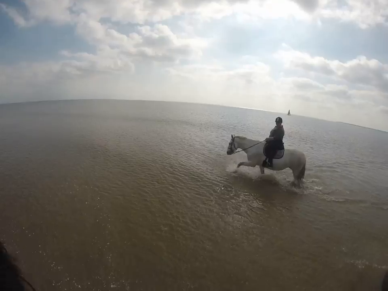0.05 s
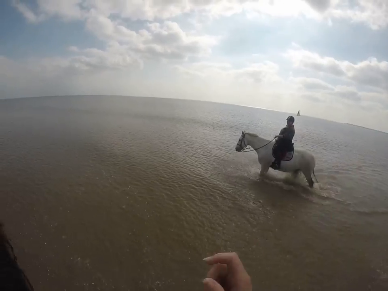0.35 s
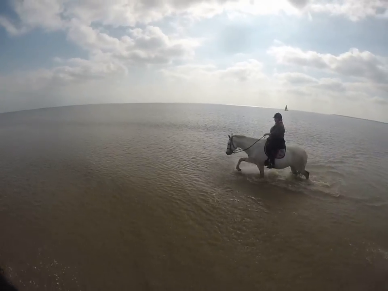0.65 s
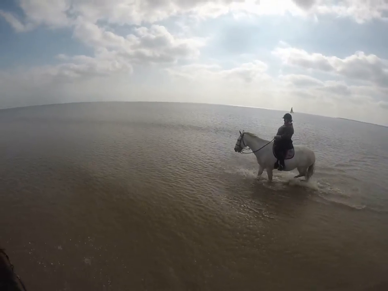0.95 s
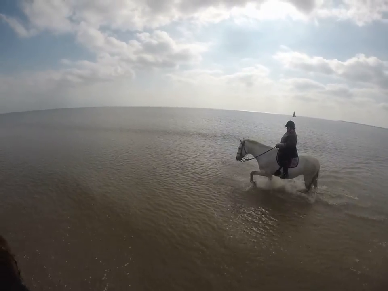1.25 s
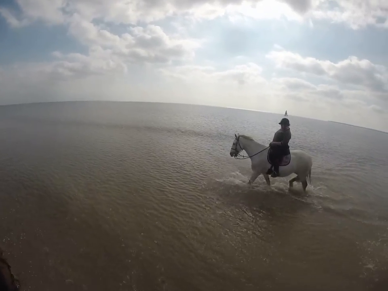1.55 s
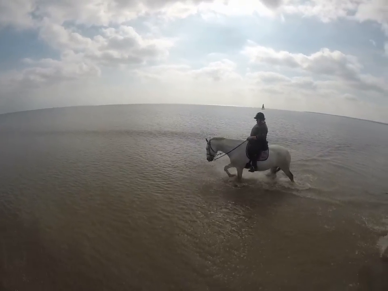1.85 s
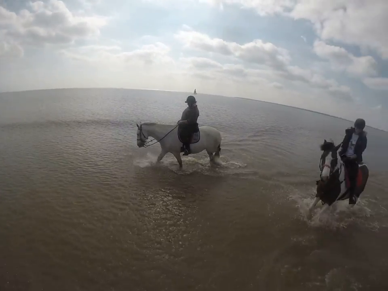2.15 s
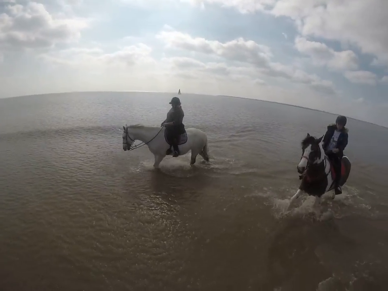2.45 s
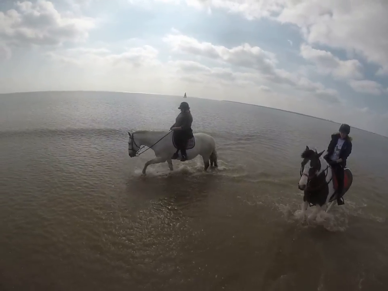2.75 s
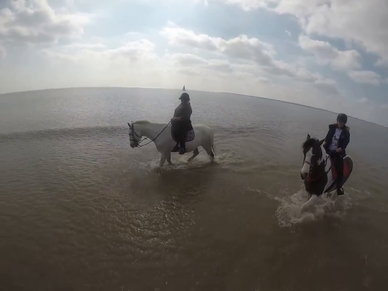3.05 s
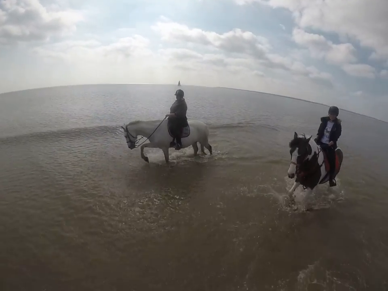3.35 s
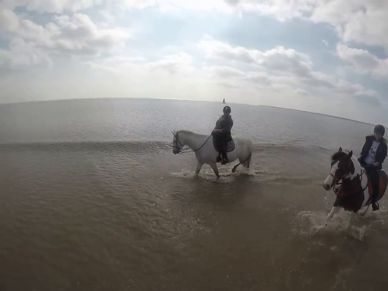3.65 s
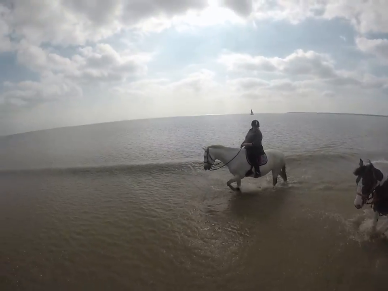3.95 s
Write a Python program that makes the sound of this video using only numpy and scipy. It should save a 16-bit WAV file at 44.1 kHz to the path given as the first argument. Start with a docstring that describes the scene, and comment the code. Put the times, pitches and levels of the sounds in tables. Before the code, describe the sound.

Two loud plastic clacks, then horses quietly splashing through shallow sea over low wind rumble.

```python
"""Sharp knocks and scuffs come first: a hand on the closed plastic housing of a rider's camera.
Then two horses wade through shallow sea. Their legs churn up bubbles, each ringing as a damped
oscillator, with spray, single splashes and gulps; air resonances of the housing colour the froth,
spray and splashes. Underneath, wind and the ride shake the camera mount into a low rumble."""
import sys
import numpy as np
from scipy.fft import rfft, irfft, next_fast_len
from scipy.io import wavfile
from scipy.ndimage import map_coordinates

SR = 44100
rng = np.random.default_rng(int(sys.argv[2]) if len(sys.argv) > 2 else 0)


def to_wav(sig):
    """Store sig (one row per channel, or 1-D mono) as 16-bit WAV at the path in sys.argv[1].

    Samples outside -1..1 are clipped; the rate is SR.
    """
    pcm = np.clip(np.atleast_2d(sig), -1, 1) * 32767
    pcm = np.round(pcm).astype(np.int16)
    wavfile.write(sys.argv[1], SR, pcm.T)  # frames by channels


N = 176400
T = np.arange(N) / SR

# Air resonances of the housing. Each row: centre in Hz, width in Hz, boost in dB.
HOUSING = [(1522, 300, 7.5), (1832, 30, 7.5), (2195, 210, 7), (2570, 210, 4.5), (3256, 264, 6),
           (3707, 200, 8), (4346, 180, 6.5), (4763, 230, 10.5), (5250, 280, 6), (6700, 320, 2.5),
           (8000, 450, 3), (9050, 270, 2.5), (11500, 650, 3)]


def churn():
    """Bubble resonance: legs whip air into the water, and each small pocket rings as it pulsates."""
    # Each row: time in seconds, relative level in dB.
    envelope = [(.24, -59.5), (.36, -59.5), (.48, -55.5), (.68, -52), (.8, -48), (.98, -51), (1.15, -50.5),
                (1.38, -50), (1.62, -48.5), (1.76, -50), (1.88, -46.5), (2.0, -51.5), (2.16, -47.5),
                (2.32, -50), (2.62, -48.5), (2.88, -50), (3.05, -48), (4.0, -51.5)]
    # Each row: frequency in Hz, relative gain in dB.
    spectrum = [(500, -37.5), (1000, -7), (1400, -2), (2000, 1.5), (2600, -0.5), (3300, -11), (6000, -45)]
    froth = bubbles(count=3000, pitch_hz=1798, spread=0.346, cycles=23, scatter_db=2, rise=0.27, size=700)
    water = unit(coloured(froth + amp(9.5) * rng.standard_normal(N), spectrum, HOUSING))
    return amp(-1.8) * level(envelope) * amp(0.23 * wobble(21.98)) * water


def spray():
    """Incoherent addition: thousands of drops falling back on the sea merge into a hiss."""
    # Each row: time in seconds, relative level in dB.
    envelope = [(0.22, -62), (0.26, -64), (0.83, -53.5), (1.09, -53.5), (1.1, -53), (1.26, -55.5),
                (1.55, -52), (2.03, -54), (2.07, -49.5), (2.32, -53), (2.5, -51), (2.75, -52.5),
                (3.16, -48.5), (3.21, -50.5), (3.5, -52), (3.54, -49.5), (3.62, -53.5), (4.0, -57)]
    # Spectra of far and near spray. Each row: frequency in Hz, relative gain in dB.
    far_spectrum = [(1500, -16), (3000, -1.5), (4500, -5), (6000, 1), (7400, -4.5), (10000, -8.5),
                    (13000, -14), (15500, -21)]
    near_spectrum = [(1500, -43), (3000, -1.5), (4500, -4.5), (6800, 2), (7500, -5.5), (10000, -9),
                     (13000, -16), (15500, -19)]
    drops = bubbles(count=5000, pitch_hz=6160, spread=0.59, cycles=6.9, scatter_db=3.5, rise=.1, size=120)
    patter = drops + amp(5) * rng.standard_normal(N)
    near = np.interp(T, [1.97, 2.4], [0, 1])  # the second horse draws alongside
    hiss = (1 - near) * unit(coloured(patter, far_spectrum, HOUSING))
    hiss += near * unit(coloured(patter, near_spectrum, HOUSING))
    return amp(-0.86) * level(envelope) * amp(0.77 * wobble(24.38)) * hiss


def slosh():
    """Pitch falls as bubble radius grows: water heaving round the legs traps large, low bubbles."""
    # Each row: time in seconds, level in dB.
    envelope = [(0.27, -64.5), (0.88, -52), (1.02, -56.5), (1.16, -50.5), (1.31, -55), (1.59, -51.5),
                (1.74, -55), (1.85, -48), (1.89, -55), (2.19, -55), (2.2, -51.5), (2.34, -55.5),
                (2.85, -53.5), (2.98, -55.5), (3.19, -52), (3.23, -50.5), (3.27, -55), (4.0, -54.5)]
    # Each row: frequency in Hz, relative gain in dB.
    spectrum = [(50, -19.5), (90, 0.5), (160, -2), (330, -4.5), (600, -5), (1000, -2.5), (1600, -7.5),
                (3000, -59)]
    cloud = bubbles(count=1800, pitch_hz=521.4, spread=0.602, cycles=19.5, scatter_db=2, rise=0.23,
                    size=2400)
    water = unit(coloured(cloud + amp(8.5) * rng.standard_normal(N), spectrum))
    return level(envelope) * amp(.5 * wobble(16)) * water


def gulps():
    """Damped oscillation: single bubbles, from deep gulps to plinks, rise in pitch as they fade."""
    # Each row: start in seconds, initial pitch in Hz, level in dB, time to fall 60 dB in seconds.
    single_bubbles = [(.88, 376, -47, .12), (1.535, 300, -42, .05), (1.795, 258, -44, 0.061),
                      (1.845, 346, -44, .06), (1.85, 620, -52, 0.038), (2.205, 313, -41, 0.039),
                      (2.785, 362.6, -43, 0.05), (3.146, 3570, -30.5, 0.023), (3.148, 4180, -35.5, .025),
                      (3.225, 266, -43, .09), (3.232, 173, -37.5, 0.06), (3.235, 780, -46.5, 0.096),
                      (3.55, 170, -57, 0.089), (3.836, 870, -35.5, 0.027)]
    out = np.zeros(N)
    for s, hz, db, t60 in single_bubbles:
        t = since(s)
        glide = 1 + 0.072 * np.minimum(t / t60, 1)
        attack = 1 - np.exp(-t / 0.0032)
        out += amp(db - 60 * t / t60) * attack * np.sin(2 * np.pi * hz * t * glide)
    return out


def splashes():
    """Impact noise: a hoof breaks the surface, and the spatter swells fast and decays exponentially."""
    # Each row: start in seconds, level in dB, time scale in seconds, tilt in dB per octave.
    impacts = [(0.486, -53.5, 0.026, 0.5), (0.581, -51.5, 0.033, -10), (1.106, -38.5, 0.0092, -1),
               (1.125, -48, 0.041, 0), (1.201, -45, 0.016, -1.5), (1.562, -48, 0.077, -2.5),
               (2.067, -51, 0.075, -1.5), (2.14, -45, 0.0065, -6), (2.204, -48, 0.022, -1),
               (2.392, -53, 0.023, 3), (2.957, -42.5, 0.022, -2), (3.052, -48, 0.033, 1),
               (3.144, -50, 0.01, 0), (3.313, -43, 0.005, -10), (3.508, -51.5, 0.022, 2),
               (3.858, -46, 0.037, -5)]
    # Each row: frequency in Hz, relative gain in dB.
    spectrum = [(300, -39), (900, -13.5), (1400, -2.5), (2300, -1), (3000, -11), (5000, -6.5),
                (7000, -11.5), (10500, -17.5), (15000, -27)]
    out = np.zeros(N)
    for s, db, length, tilt in impacts:
        age = since(s) / length
        envelope = amp(db) * 2 * (1 - np.exp(-age / 0.21)) * np.exp(-1.6 * age)
        out += envelope * unit(coloured(rng.standard_normal(N), spectrum, HOUSING[:3], tilt))
    return out


def knocks():
    """Impulse response: the struck plastic shell clacks, rings faintly and snaps."""
    # Two knocks and a rebound. Each row: start in seconds, level in dB, tilt in dB per octave.
    blows = [(.0786, -9, 6.5), (0.1753, -1, 2.5), (0.1777, -20, 6)]
    # Each row: frequency in Hz, level relative to the knock in dB, time to fall 60 dB in seconds.
    shell_modes = [(1808, -37.5, 0.24), (1874, -37.5, 0.17)]
    # Each row: start in seconds, pitch in Hz, level in dB, time to fall 60 dB in seconds.
    fingertip_taps = [(.1175, 850, -33, 0.049)]
    # Each row: start in seconds, peak in dB.
    snaps = [(.0779, -24), (.0786, -4.5), (0.0788, -19)]
    # Each row of both spectra: frequency in Hz, relative gain in dB.
    clack_spectrum = [(200, 0), (500, -7.5), (850, -14), (1350, 1), (1550, -3.5), (1900, 1), (2200, 3.5),
                      (2480, -4.5), (2800, -26.5), (4100, -16.5), (5300, -27.5), (6300, -20), (7500, -41.5),
                      (8700, -30.5), (11000, -48), (15000, -59)]
    snap_spectrum = [(1000, -38), (4000, 0.5), (7000, 0), (9000, 8), (11500, 5), (13000, -5), (16000, -26)]
    out = np.zeros(N)
    for s, db, tilt in blows:
        ring = sum(damped_sine(s, *mode) for mode in shell_modes)
        out += amp(db) * (click(s, clack_spectrum, tilt) + ring)
    out += sum(damped_sine(*tap) for tap in fingertip_taps)
    return out + sum(amp(db) * click(s, snap_spectrum) for s, db in snaps)


def scuffs():
    """Sliding friction: fingers rub the housing in short bursts of noise."""
    # Each row: start in seconds, length in seconds, level in dB.
    rubs = [(.075, 0.0073, -27.5), (0.0838, 0.0034, -27.5), (0.092, 0.0082, -34.5), (0.104, 0.0023, -41.5),
            (0.1131, 0.0093, -33.5), (0.132, 0.046, -45), (0.188, 0.011, -47.5)]
    # Each row: frequency in Hz, relative gain in dB.
    spectrum = [(100, 7), (700, 1), (1300, 1.5), (2100, 4.5), (3000, -7), (6000, -11), (9000, -14.5),
                (13000, -26), (16000, -44)]
    # Resonances under the fingers. Each row: centre in Hz, width in Hz, boost in dB.
    hollow = [(850, 60, 5), (2180, 720, 0)]
    contact = sum(amp(db) * np.exp(-np.abs(2 * (T - s) / length - 1) ** 3) for s, length, db in rubs)
    return contact * unit(coloured(rng.standard_normal(N), spectrum, hollow))


def pushes():
    """Compression and rarefaction: each push of the hand on the housing makes one two-sided pulse."""
    # Each row: centre in seconds, half width in seconds, peak in dB.
    pulses = [(0.0798, 0.0018, -20), (.081, 0.0063, -29.5), (0.1326, 0.0056, -27), (.1525, .0016, -23),
              (0.1759, .0011, -20.5)]
    out = np.zeros(N)
    for s, width, db in pulses:
        lead = (s - T) / width
        out += amp(db) * lead * np.exp((1 - lead ** 2) / 2)
    return out


def mount():
    """Forced and free vibration: wind and the ride shake the mount; shoves ring its natural frequency."""
    # Each row: time in seconds, level in dB.
    envelope = [(0.27, -55), (1.2, -51), (1.22, -47.5), (1.56, -54.5), (1.74, -46), (1.91, -50),
                (1.95, -45), (2.02, -57), (2.06, -44.5), (2.4, -52), (2.5, -44), (2.75, -50), (2.82, -46.5),
                (3.35, -46), (3.38, -42), (3.91, -54), (3.96, -51), (4.0, -43)]
    # Each row: frequency in Hz, relative gain in dB.
    spectrum = [(8, -17), (18, -0.5), (38, -7), (53, -1.5), (62, -2.5), (75, -18), (130, -17.5),
                (300, -53.5)]
    # Each row: start in seconds, relative level in dB.
    shoves = [(.122, -27), (0.186, -26.5), (1.224, -35), (1.931, -43), (2.06, -41), (2.47, -41),
              (2.83, -42), (3.368, -34), (3.541, -40)]
    out = level(envelope) * unit(coloured(rng.standard_normal(N), spectrum))
    for s, db in shoves:
        attack = 1 - np.exp(-since(s) / .015)
        out += attack * damped_sine(s, hz=51, db=db, t60=.2)
    return out


def bubbles(count, pitch_hz, spread, cycles, scatter_db, rise, size):
    """Superposition of random rising sines, each size samples long and 60 dB down after cycles; rms 1."""
    draws = rng.random((count, 2))
    hz = np.clip(pitch_hz * np.exp(spread * rng.standard_normal((count, 1))), 80, SR / 3)
    t = np.arange(size) / SR
    age = t * hz / cycles
    strength = amp(scatter_db * np.minimum(-np.log(1 - draws[:, 1:]), 4))
    glide = 1 + rise * np.minimum(age, 1) / 2
    rings = strength * amp(-60 * age) * np.sin(2 * np.pi * hz * t * glide)
    at = (draws[:, :1] * N).astype(int) + np.arange(size)
    return unit(np.bincount(at.ravel(), rings.ravel(), N + size)[:N])


def damped_sine(s, hz, db, t60):
    """Free decay of one mode from time s, falling 60 dB in t60 seconds."""
    t = since(s)
    return amp(db - 60 * t / t60) * np.sin(2 * np.pi * hz * t)


def click(s, spectrum, tilt_db=0):
    """Impulse response of a spectrum at time s, peak 1."""
    impulse = 1. * (np.arange(N) == round(s * SR))
    response = coloured(impulse, spectrum, (), tilt_db)
    return response / np.abs(response).max()


def coloured(x, points, resonances=(), tilt_db=0):
    """Minimum-phase filter from (Hz, dB) points, resonance peaks and a tilt per octave above 1 kHz."""
    m = 2 * next_fast_len(N // 2 + 8192)
    f = np.fft.rfftfreq(m, 1 / SR) + 1
    hz, db = np.transpose(points)
    shape = np.interp(np.log(f), np.log(hz), db) + tilt_db * np.log2(np.maximum(f, 1000) / 1000)
    for centre, width, boost in resonances:
        shape += boost * 2 ** -(2 * (f - centre) / width) ** 2
    cepstrum = irfft(shape * np.log(10) / 20)
    cepstrum[1:m // 2] *= 2  # folding onto positive time makes the filter causal
    cepstrum[m // 2 + 1:] = 0
    return irfft(rfft(x, m) * np.exp(rfft(cepstrum)), m)[:N]


def amp(db):
    """Decibels to gain."""
    return 10 ** (np.asarray(db) / 20)


def unit(x):
    """Scale to rms 1."""
    return x / np.sqrt(np.mean(x ** 2) + 1e-20)


def level(rows):
    """Gain per sample from rows of seconds and dB."""
    return amp(np.interp(T, *np.transpose(rows)))


def wobble(rate):
    """A smooth random curve, rate knots a second."""
    return map_coordinates(rng.standard_normal(int(4.6 * rate) + 4), [T * rate], mode="nearest")


def since(s):
    """Time since s, zero before it."""
    return np.maximum(T - s, 0)


def scene():
    """Superposition: water, hand and mount add at one microphone after a brief silence."""
    water = churn() + spray() + slosh() + gulps() + splashes()
    hand = knocks() + scuffs() + pushes()
    fade_in = np.clip(since(.072) / 0.0033, 0, 1)
    return ((water + hand + mount()) * fade_in)[None]


def record(dry):
    """Band limiting: the camera passes nothing above its top frequency."""
    top_hz = 15400
    m = next_fast_len(N + SR // 2)
    return irfft(rfft(dry, m) * (np.fft.rfftfreq(m, 1 / SR) < top_hz), m)[:, :N]


dry = scene()
out = record(dry)
to_wav(out)
```